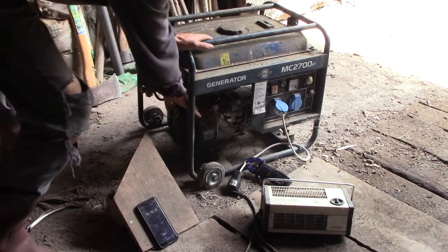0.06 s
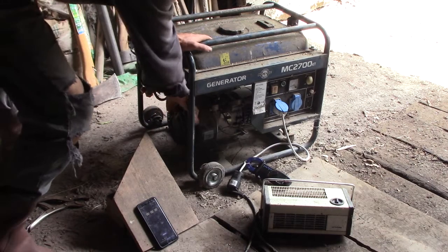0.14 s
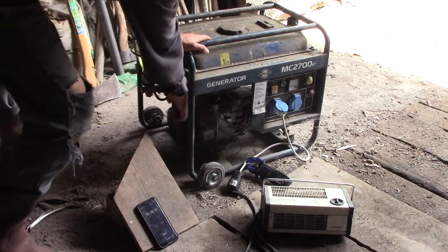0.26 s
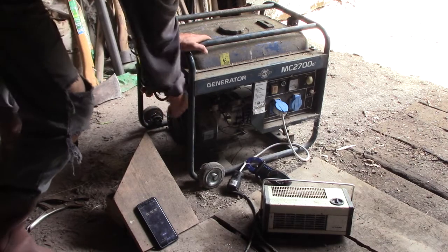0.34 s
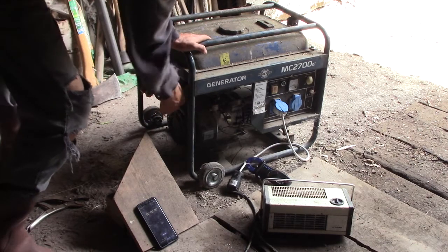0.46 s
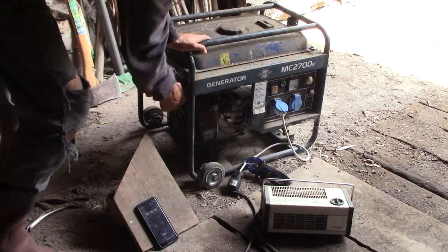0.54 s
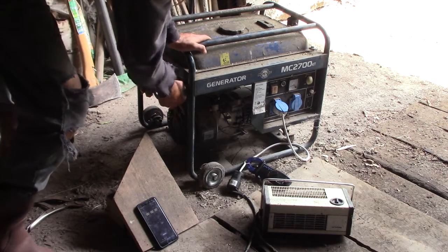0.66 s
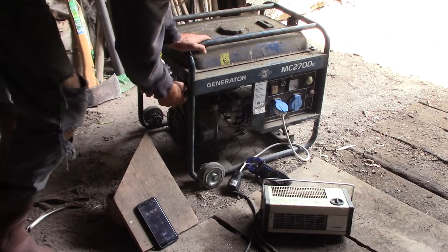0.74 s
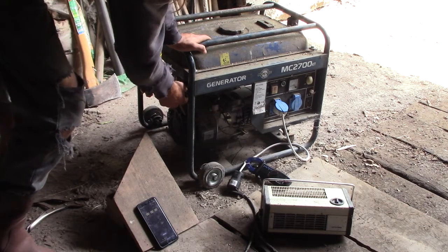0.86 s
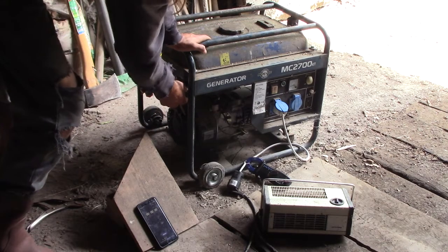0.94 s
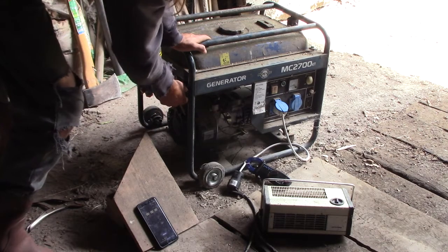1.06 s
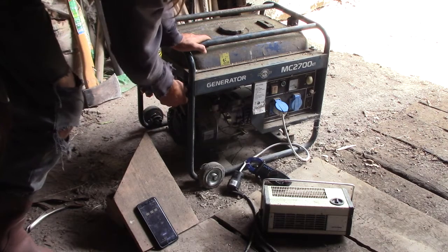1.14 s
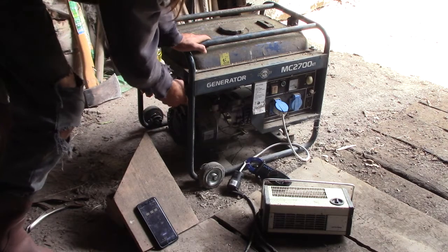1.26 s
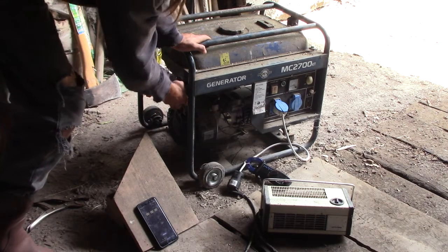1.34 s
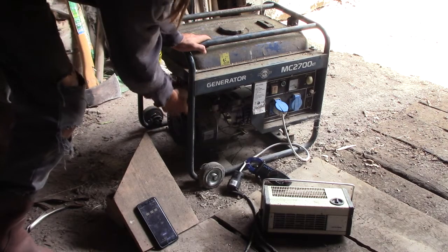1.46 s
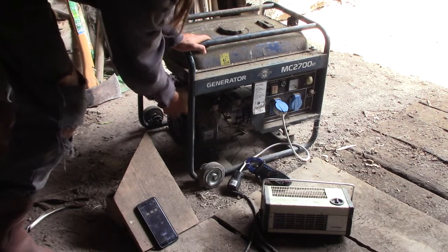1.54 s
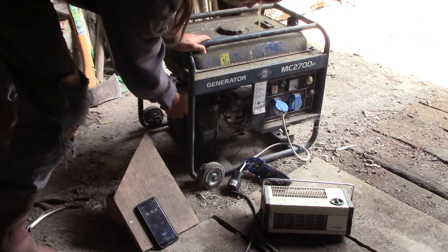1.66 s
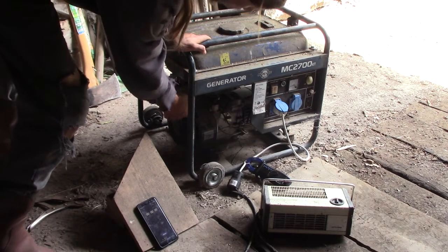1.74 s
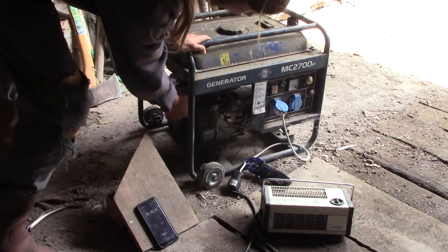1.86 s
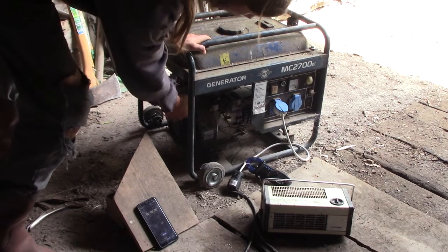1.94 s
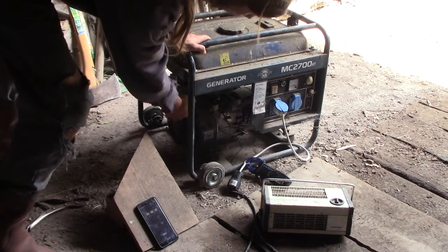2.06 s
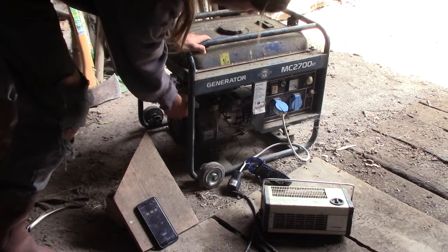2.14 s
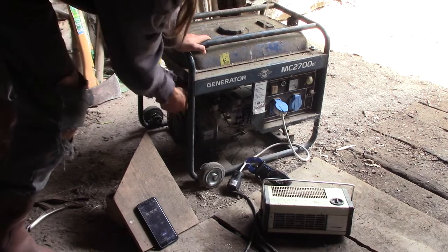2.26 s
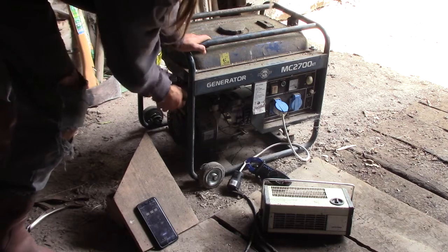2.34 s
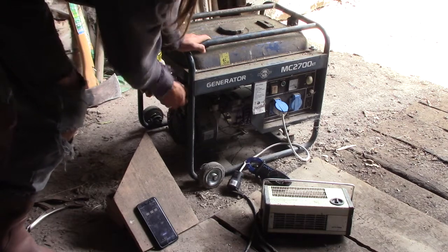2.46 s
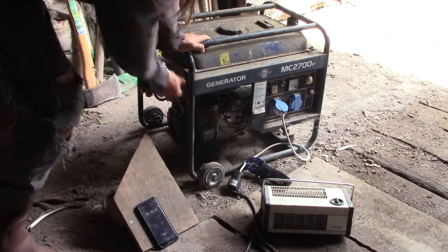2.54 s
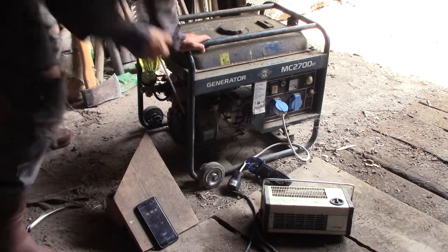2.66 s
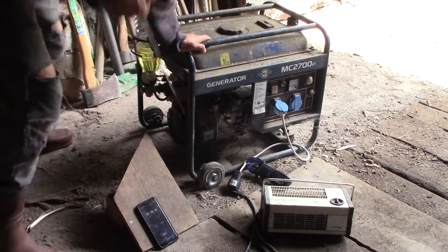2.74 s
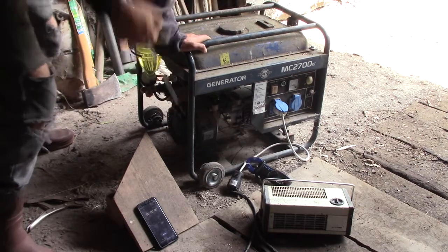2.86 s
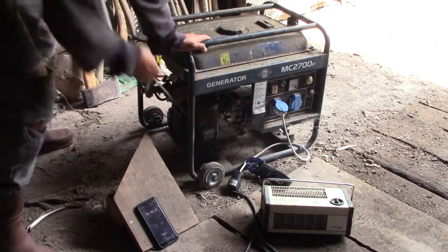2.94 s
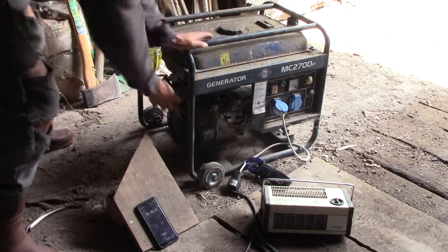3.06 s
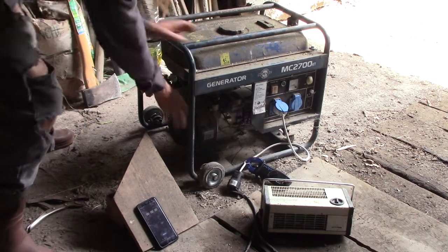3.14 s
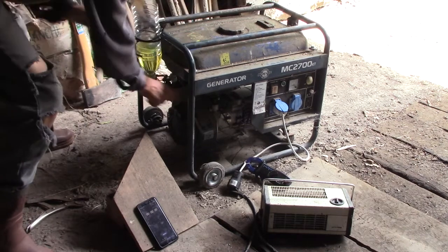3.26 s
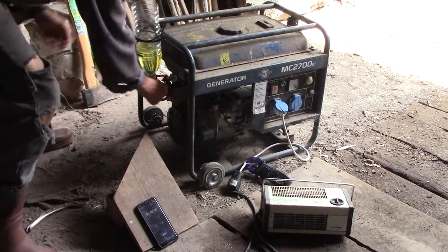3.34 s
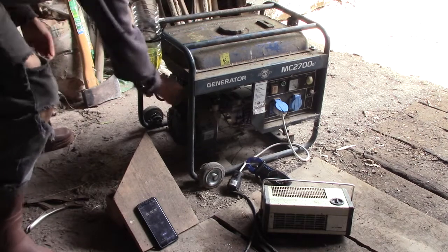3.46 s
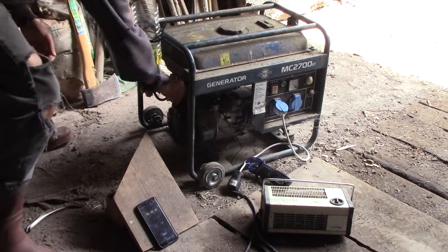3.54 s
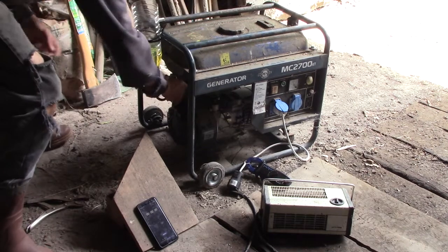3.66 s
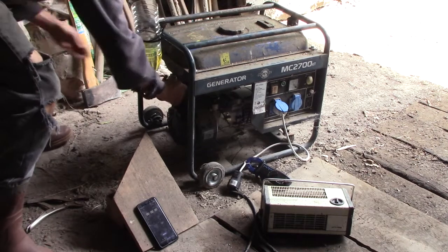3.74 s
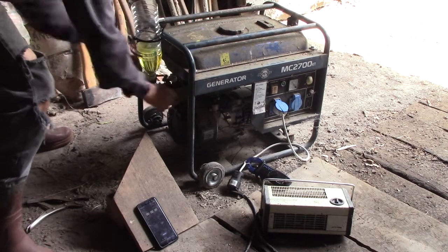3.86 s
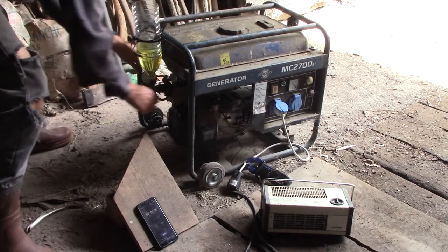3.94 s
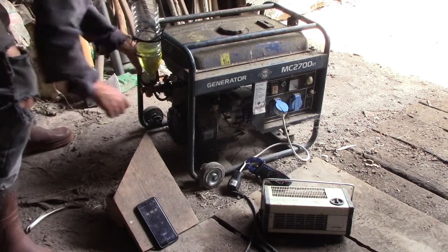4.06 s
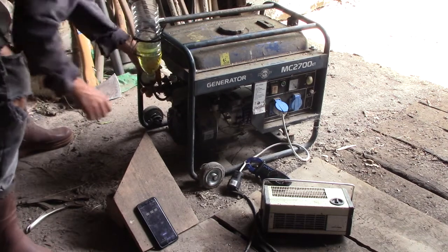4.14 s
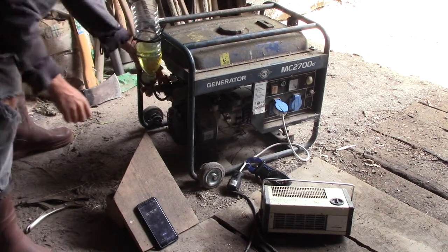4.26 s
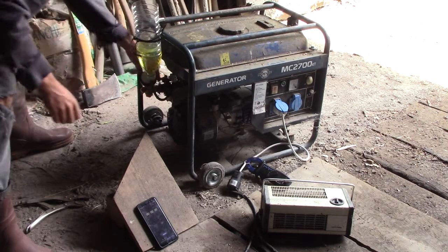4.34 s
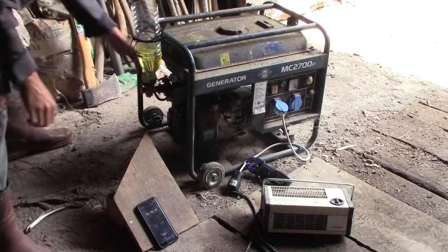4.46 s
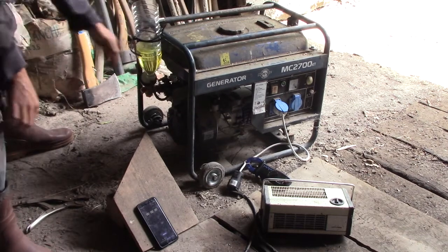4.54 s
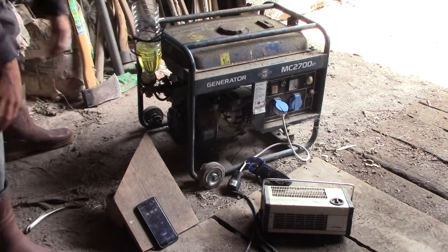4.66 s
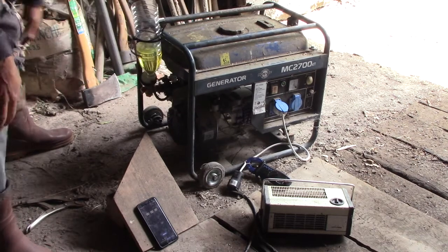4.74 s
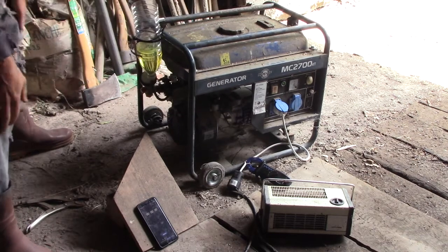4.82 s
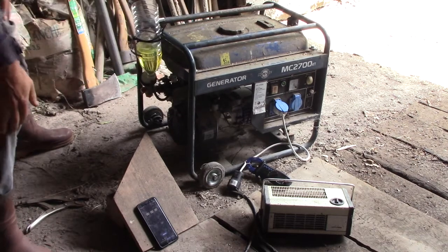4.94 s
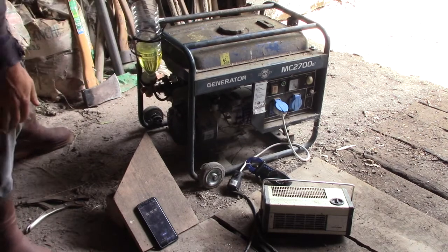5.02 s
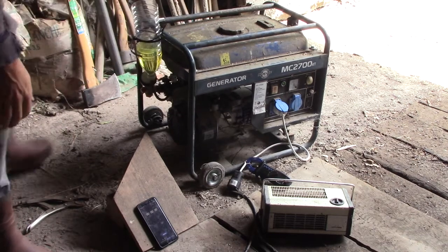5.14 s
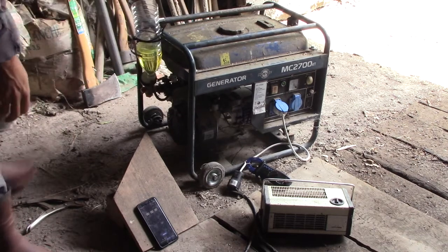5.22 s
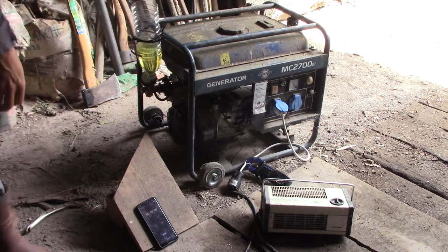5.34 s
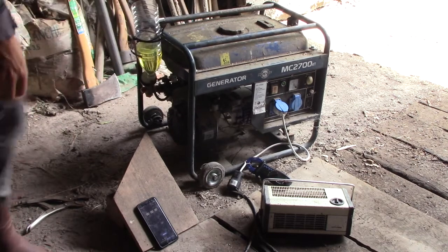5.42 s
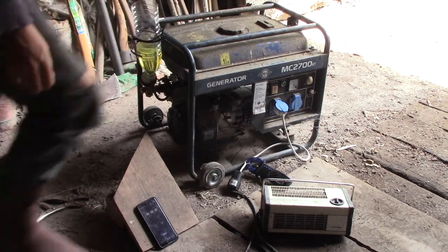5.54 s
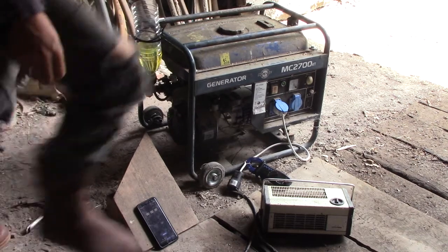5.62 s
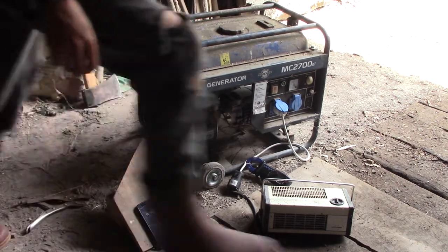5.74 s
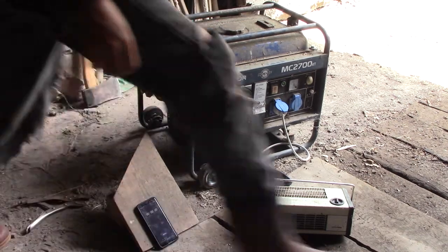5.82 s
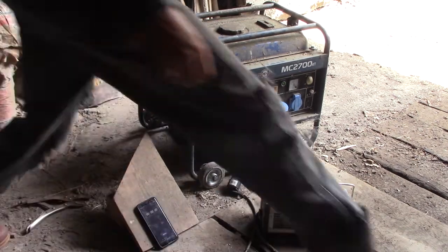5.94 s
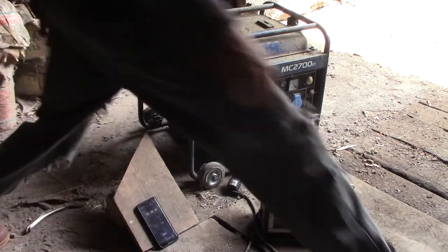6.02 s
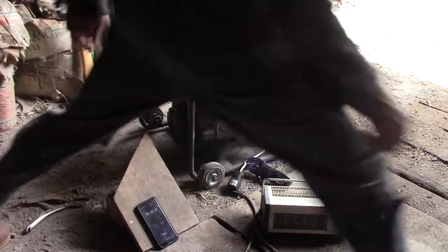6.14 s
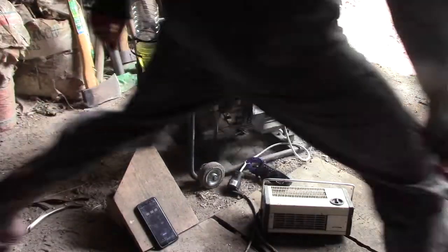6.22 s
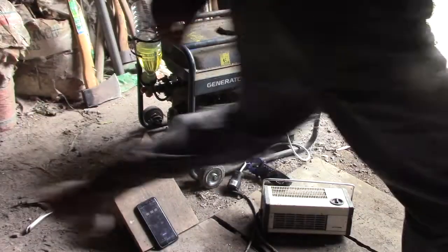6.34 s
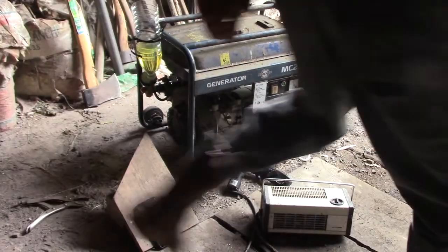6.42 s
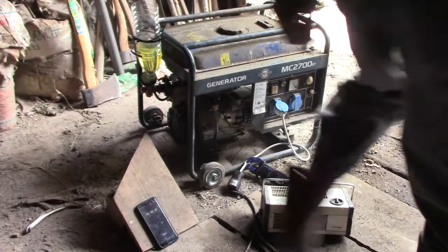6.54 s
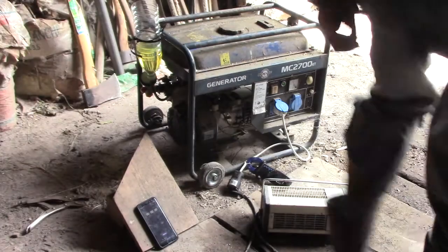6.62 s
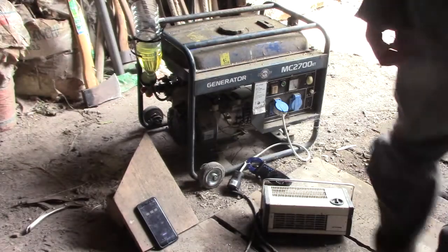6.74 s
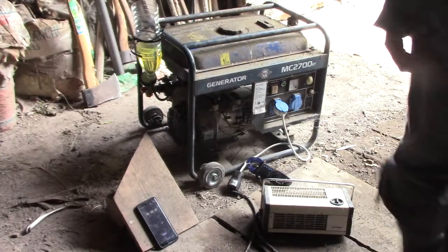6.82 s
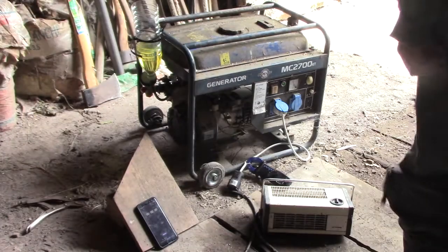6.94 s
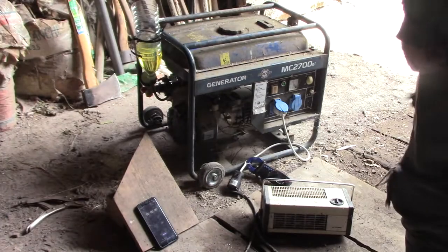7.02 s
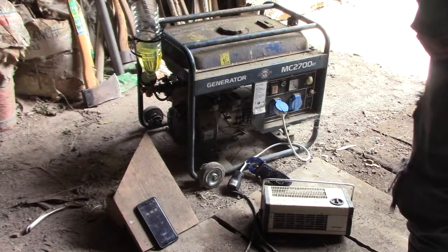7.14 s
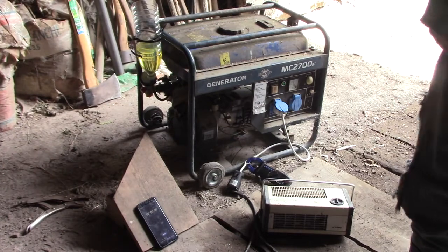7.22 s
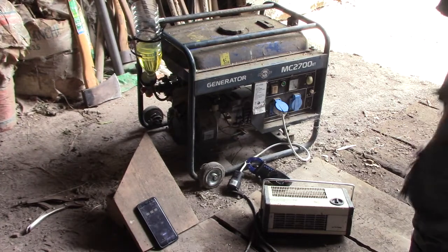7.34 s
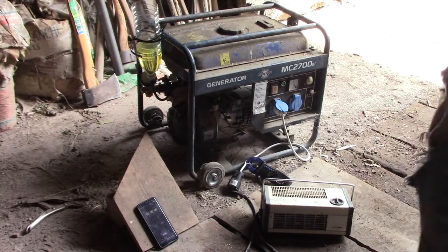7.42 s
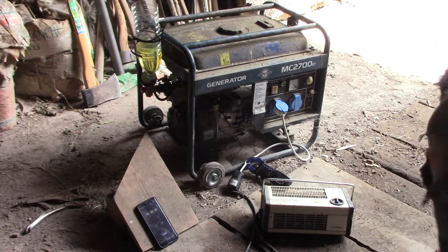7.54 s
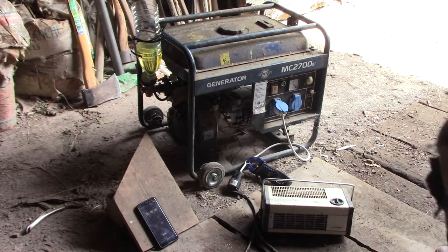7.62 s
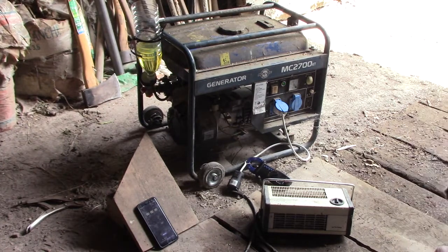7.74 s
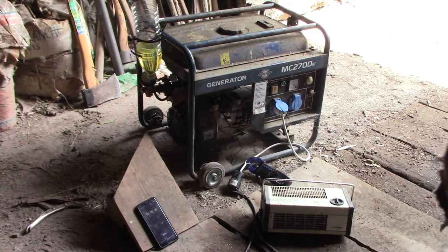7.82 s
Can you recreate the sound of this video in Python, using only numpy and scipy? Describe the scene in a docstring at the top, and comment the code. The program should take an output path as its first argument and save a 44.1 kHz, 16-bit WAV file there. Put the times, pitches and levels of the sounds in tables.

```python
"""A small petrol generator in an open shed

Fingers click its levers, the starter cord is pulled, the single cylinder fires slowly, catches, shakes a
loose panel and runs up to a nearly steady speed; someone then walks past in front. Firings ring a silencer,
valve blows stir noise for the metal parts, knocks ring the frame, and a faint yard murmurs behind.
A close pair of microphones hears it almost in mono, through a peak limiter."""
import sys
import numpy as np
from scipy import signal
from scipy.fft import rfft, irfft, next_fast_len
from scipy.io import wavfile
from scipy.ndimage import uniform_filter1d, minimum_filter1d, map_coordinates

SR = 44100
rng = np.random.default_rng(int(sys.argv[2]) if len(sys.argv) > 2 else 0)


def master(y):
    """Save y as 16-bit WAV."""
    cut = np.clip(np.atleast_2d(y).T, -1, 1)
    pcm = np.round(cut * 32767)  # scale
    wavfile.write(sys.argv[1], SR, pcm.astype(np.int16))


def natural_amplitude(level_db):
    """Convert a level in decibels to a linear amplitude factor, elementwise."""
    exponent = np.asarray(level_db, float) / 20
    return 10 ** exponent


N = 347949  # length in samples

# first, uneven firings: start_s, puff_peak_db
FIRST_FIRINGS = [(2.912, -20.5), (3.07, -17), (3.212, -21.5), (3.339, -16), (3.463, -16.5), (3.59, -16.5),
                 (3.72, -20), (3.846, -18), (3.981, -11), (4.049, -19), (4.107, -17.5), (4.162, -19),
                 (4.213, -9), (4.26, -11), (4.317, -23), (4.374, -47), (4.43, -17), (4.484, -12.5),
                 (4.539, -14.5), (4.588, -21), (4.64, -20), (4.686, -19.5), (4.736, -19.5), (4.789, -22)]
# running up, then holding a speed that drifts a little: time_s, firings_per_s
RUNNING_SPEED = [(4.55, 19.2), (4.72, 20.9), (4.84, 22.1), (5.07, 25.5), (5.2, 27.4), (5.27, 28.2),
                 (5.4, 29.3), (5.74, 31.3), (5.89, 32.2), (6.26, 33.3), (6.62, 33.9), (6.78, 33.4),
                 (7.14, 33.9), (7.36, 33.7), (7.41, 33.9), (7.81, 34.1), (7.89, 33.9)]
EVEN_FROM_S = 4.83  # from here firings follow the running speed
# level of each part by engine speed, before its own swells and boosts:
# firings_per_s, exhaust_db, casing_db, clatter_db, shudder_db, spikiness_0_to_1 (how far blows shape the noise)
LEVELS_BY_SPEED = [(6.85, -38, -40, -48.5, -37, 0.76), (19.3, -47, -36, -49, -32, 0.48),
                   (23.4, -32, -38, -47.5, -34.5, 0.37), (30.3, -29.5, -29, -39, -37.5, 0.1),
                   (32.9, -29.5, -31.5, -40.5, -48.5, 0.14)]

# response of the hot silencer, peaks and valleys: pitch_hz, level_db
HOT_SILENCER = [(35, -63), (65, -34), (100, -26), (120, -13), (137, -16), (170, -22), (203, -17),
                (236, -22), (270, -16), (296, -14), (316, -7), (338, -5), (372, -7), (396, -3), (410, 1),
                (440, -15), (503, -11), (560, -19), (700, -19), (748, -5), (790, -20), (940, -25),
                (985, -12), (1020, -25), (1195, -16), (1300, -23), (1355, -13), (1400, -22), (1560, -28),
                (1626, -19), (1700, -30), (4000, -90)]
# resonances of the cold silencer, before gas flow damps them: pitch_hz, width_hz, level_db
COLD_SILENCER = [(138, 48, -16), (205, 51, -13), (260, 12, -5), (316, 9, 5), (408, 20, -6), (690, 60, -18)]
DAMPING_RATE = 27  # firings per s at which the gas flow doubles the damping of the cold silencer
SWEEP_S_PER_HZ = .00005  # how much later each higher note leaves the main chamber
# the main chamber leads while the engine catches, sags late in the run-up, returns strong and settles
BOOM_EARLY_DB, BOOM_DIP_DB, BOOM_BACK_DB = 4.5, -3, 8.5
BOOM_DIP_S, BOOM_EDGE_S, BOOM_SETTLE_S = (5.27, 5.86), 0.072, 0.44

# clean tones under full throttle, the last a whine: multiple_of_firing_rate, level_db
THROTTLE_TONES = [(6, -55), (7, -39), (8, -58), (9, -39.5), (76, -45)]
# thin tones at steady speed: multiple_of_firing_rate, level_db
THIN_TONES = [(60, -50), (96, -55)]
THROTTLE_S, THROTTLE_EDGE_S, THROTTLED_DB = (4.65, 6.35), 0.22, -8  # opens and closes, edge, tones once closed

# the cord pull heard in the casing: time_s, level_db
CORD_PULL = [(2.47, -79), (2.53, -61), (2.59, -40.5), (2.7, -43), (2.76, -30), (2.795, -38), (2.902, -36.5)]
# the starter's rattle peaks as the cord runs out
PAWL_PEAK_S, PAWL_PEAK_DB, PAWL_RISE_DB_PER_S, PAWL_FALL_DB_PER_S = 2.772, -38, 116, 113
# colour of the casing roar: pitch_hz, relative_db_per_hz
CASING_COLOUR = [(25, -62), (120, -44), (250, -30), (450, -24), (620, -13), (1000, -17), (1500, -18),
                 (3000, -22), (4400, -28), (5500, -45), (9000, -90)]
# notes that stand out of the casing roar: pitch_hz, width_hz, boost_db
CASING_NOTES = [(680, 40, 3), (750, 25, 3), (1420, 40, 3)]
# colour of the metallic clatter: pitch_hz, relative_db_per_hz
CLATTER_COLOUR = [(2500, -0.5), (4000, 1), (5700, 3), (6300, 0), (8400, 2.5), (9100, 3.5), (10500, -5),
                  (12500, -12), (15000, -18), (16000, -34)]
# resonances of the tappets: pitch_hz, width_hz, level_db
TAPPET_NOTES = [(1270, 110, 7), (695, 29, 4.5), (4150, 89, -1), (8080, 220, -1), (10600, 730, -3)]
# colour of the low shudder of the frame: pitch_hz, relative_db_per_hz
SHUDDER_COLOUR = [(25, -57), (70, -17.5), (130, -8), (250, -0.5), (420, -1), (600, -10.5), (900, -42)]
SHUDDER_START_S, SHUDDER_BUILD_S = 2.457, 0.39
PASSING_S, PASSING_HALF_S = 5.88, 0.28  # a body walks past
PASSING_CASING_DB, PASSING_CLATTER_DB = -1.5, -3.5  # and shades these two

# resonances of the loose panel: pitch_hz, width_hz, level_db
PANEL_NOTES = [(1800, 330, 1), (3130, 430, 4), (3730, 750, -1), (8900, 4000, -20)]
# it slaps after each firing while the engine shakes, hardest midway
SLAPPING_S, SLAP_LAG_S, SLAP_PEAK_S = (4.03, 4.66), 0.01, 4.4
SLAP_DB, SLAP_FADE_DB_PER_S = -17.5, 7  # before the burst shape
# bouts of a loose cover's rattle: time_s, peak_db
RATTLE_BOUTS = [(5.25, -30), (5.55, -28), (5.87, -31), (6.32, -29), (6.44, -27), (6.53, -27), (6.75, -26),
                (6.91, -25), (7.36, -30), (7.74, -28), (7.86, -28)]
RATTLE_HZ, RATTLE_LAG_S, RATTLE_BOUT_S, RATTLE_IDLE_DB = 1335, .017, .05, -33
# parts that ring at one point of the slow cycle: share_of_cycle, pitch_hz, level_db (before the soft attack), t60_s
SLOW_PINGS = [(0.38, 1410, -25, 0.058), (0.9, 1300, -23, 0.049), (0.22, 4220, -28, 0.03),
              (0.64, 3900, -30, 0.036)]

# finger and starter knocks on the steel frame: start_s, peak_db (between 1 and 5 kHz), thud_db, brightness_db
FRAME_KNOCKS = [(0.098, -58, 16.5, -30), (0.26, -41.5, -15, -30), (0.3032, -50, 1, -22),
                (0.3675, -40.5, -5, -26), (0.386, -35, -1, -1.5), (0.403, -57, 8, -30),
                (0.687, -53, 3.5, -15), (1.0111, -60.5, 10.5, -7), (1.554, -47, 6.5, -25),
                (2.1155, -49.5, -11, -11), (2.167, -44, -2, -27), (2.1908, -42, -6, -37),
                (2.2526, -34.5, 2.5, -6.5), (2.4302, -55.5, -11, -12), (2.5243, -51, 13.5, 4),
                (2.5821, -40, 7.5, -10), (2.6292, -37, 12.5, -10), (2.7032, -25.5, -6, 6.5),
                (2.7298, -14, -20, 0), (2.7548, -29, 7, -17), (2.7895, -26, -2, -5), (2.806, -27, 3, -15),
                (3.0864, -9.5, -0.5, -17), (3.105, -24, 5, -23)]
# resonances of the steel frame: pitch_hz, width_hz, level_db
FRAME_NOTES = [(300, 100, -10), (465, 30, -3), (600, 50, 1), (740, 60, 4), (1210, 90, -5), (1400, 90, 1),
               (1720, 35, -4), (2500, 40, -3), (2960, 200, -5), (3300, 160, -8), (4130, 35, -3),
               (6000, 3000, -15), (6250, 60, -10), (8350, 140, 0), (9150, 120, -4), (10300, 60, -5),
               (12100, 40, -4), (12750, 40, -5), (13250, 50, -5)]
SCUFF_DB, SCUFF_S = -23, 0.07  # a hand scuffs off after each lever knock: level against its peak, dying time

# colour of the yard murmur, also used for scuffs: pitch_hz, relative_db_per_hz
YARD_COLOUR = [(25, -30), (130, -9.5), (230, -4.5), (500, -0.5), (800, -7), (1100, -8), (2000, -15.5),
               (4000, -22), (8300, -28.5), (15900, -44)]
YARD_DB = -67
# how long the shed rings: pitch_hz, t60_s
SHED_DECAY = [(200, 0.92), (1500, 0.096), (6000, 0.023), (14000, 0.0078)]
# weight of the stereo difference, before a 3 dB lift: pitch_hz, level_db
STEREO_SPREAD = [(30, -31), (125, -62), (250, -56.5), (550, -45.5), (1650, -33.5), (4970, -24),
                 (9000, -22.5), (15000, -20)]


def unit(x):
    """Scales a sound to rms 1."""
    return x / np.sqrt(np.mean(x ** 2) + 1e-20)


def along(points, hz):
    """Reads (Hz, value) points on a log pitch axis."""
    f, v = np.transpose(points)
    return np.interp(np.log(hz + 1), np.log(f + 1), v)


def curves(rows):
    """Gives one value per sample for each column after the time."""
    s, *cols = np.transpose(rows)
    return [np.interp(np.arange(N) / SR, s, c) for c in cols]


def wobble(rate):
    """Draws a smooth random curve with this many knots a second."""
    knots = rng.standard_normal(int(N * rate / SR) + 4)
    return map_coordinates(knots, [np.arange(N) * rate / SR])


def filtered(x, response):
    """Filters x by a complex response of frequency."""
    m = 2 * next_fast_len(N // 2 + SR // 4)
    return irfft(rfft(x, m) * response(np.fft.rfftfreq(m, 1 / SR)), m)[..., :N]


def modes(table):
    """Builds the response of a set of resonances, with alternating signs."""
    def response(f):
        return sum((-1) ** k * natural_amplitude(db) * 1j * f * w / (c * c - f * f + 1j * f * w)
                   for k, (c, w, db) in enumerate(table))
    return response


def causal(points):
    """Builds a response through (Hz, dB) points that acts as early as it can (minimum phase)."""
    def response(hz):
        cepstrum = irfft(np.log(natural_amplitude(along(points, hz))))
        half = len(cepstrum) // 2
        folded = np.r_[cepstrum[0], 2 * cepstrum[1:half], cepstrum[half], np.zeros(half - 1)]
        return np.exp(rfft(folded))
    return response


def noise(spectrum):
    """Makes coloured noise of rms 1."""
    return unit(filtered(rng.standard_normal(N), lambda hz: natural_amplitude(along(spectrum, hz))))


def impulses(times, sizes):
    """Places one spike per event."""
    return np.bincount(np.clip(np.round(times * SR).astype(int), 0, N - 1), sizes, N)


def burst(x, rise, fall):
    """Turns every spike into an envelope that rises and falls with these time constants (s)."""
    t = np.arange(SR // 4) / SR
    return signal.fftconvolve(x, (1 - np.exp(-t / rise)) * np.exp(-t / fall))[:N]


def step_at(s, edge):
    """Makes a smooth change from 0 to 1 around a moment."""
    return (1 + np.tanh((np.arange(N) / SR - s) / edge)) / 2


def firing_times():
    """The uneven start, then a firing each time the running rate completes a cycle."""
    running = curves(RUNNING_SPEED)[0] * (np.arange(N) >= EVEN_FROM_S * SR)
    cycles = np.cumsum(running) / SR
    even = np.flatnonzero(np.diff(np.ceil(cycles))) / SR
    return np.transpose(FIRST_FIRINGS)[0], even


def engine_map():
    """Reads each part's level per sample from the speed that the firings show."""
    times = np.concatenate(firing_times())
    gaps = np.diff(times)
    speed = np.interp(np.arange(N) / SR, times[:-1] + gaps / 2, 1 / gaps)
    smooth_speed = uniform_filter1d(speed, size=4410)
    rate, *parts = np.transpose(LEVELS_BY_SPEED)
    return [np.interp(smooth_speed, rate, p) for p in parts]


def exhaust():
    """Even firings blow the hot silencer, whose resonances lie higher than the cold one's."""
    even, t = firing_times()[1], np.arange(N) / SR
    chance = rng.standard_normal((len(even), 2))
    pulses = impulses(even + .00008 * chance[:, 0], natural_amplitude(.7 * chance[:, 1]))
    turns = rng.uniform(-np.pi, np.pi, 700)

    def silencer(hz):
        # the baffles smear the pulse: outside the main chamber every note leaves at its own moment
        outside = (hz > 450) | (hz < 255)
        smear = np.exp(1j * np.interp(hz / 34, np.arange(700), turns) * outside)
        # inside it the higher notes leave later, so each pulse sweeps upward
        sweep = np.exp(-1j * np.pi * SWEEP_S_PER_HZ * (np.clip(hz, 255, 450) - 300) ** 2)
        return causal(HOT_SILENCER)(hz) * smear * sweep

    note = unit(filtered(pulses, silencer))
    boom = filtered(note, lambda hz: np.exp(-((hz - 375) / 60) ** 4))
    gone, back = (step_at(s, BOOM_EDGE_S) for s in BOOM_DIP_S)
    settling = back * np.exp(-((t - BOOM_DIP_S[1]) / BOOM_SETTLE_S) ** 2)
    boom_db = BOOM_EARLY_DB * (1 - gone) + BOOM_DIP_DB * (gone - back) + BOOM_BACK_DB * settling
    return natural_amplitude(engine_map()[0]) * (note + (natural_amplitude(boom_db) - 1) * boom)


def chugs():
    """The first firings thump in the cold silencer; each stirs its resonances differently."""
    out, f = np.zeros(N + SR), np.fft.rfftfreq(SR, 1 / SR)
    gaps = np.diff(np.r_[firing_times()[0], EVEN_FROM_S])
    blunt = 1j * f / (90 + 1j * f) / (1 + 1j * f / 600) ** 2  # a soft-edged push of gas
    stirs = rng.standard_normal((len(FIRST_FIRINGS), len(COLD_SILENCER), 2))
    for (s, db), gap, stir in zip(FIRST_FIRINGS, gaps, stirs):
        damping = 1 + (1 / gap / DAMPING_RATE) ** 2
        stirred = [(c * (1 + .008 * u), w * damping, level + 2.5 * v)
                   for (c, w, level), (u, v) in zip(COLD_SILENCER, stir)]
        puff = irfft(modes(stirred)(f) * blunt)[:SR // 2]
        puff = natural_amplitude(db) * puff / np.max(abs(puff))
        out[round(s * SR):][:len(puff)] += puff
        # the rising piston pushes out a second, weaker puff
        out[round((s + .3 * gap) * SR):][:len(puff)] += natural_amplitude(-11.0) * puff
    return out[:N]


def engine_tones():
    """Open throttle: multiples of the firing rate glide as clear tones; once closed, thin high ones hold."""
    turn = 2 * np.pi * np.cumsum(curves(RUNNING_SPEED)[0]) / SR
    opened, closed = (step_at(s, THROTTLE_EDGE_S) for s in THROTTLE_S)
    clear = sum(natural_amplitude(db + 2.1 * wobble(3.8)) * np.sin(k * turn + rng.uniform(0, 2 * np.pi))
                for k, db in THROTTLE_TONES)
    thin = sum(natural_amplitude(db + 5.7 * wobble(9.9)) * np.sin(k * turn) for k, db in THIN_TONES)
    return np.sqrt(2) * (opened * natural_amplitude(THROTTLED_DB * closed) * clear + closed * thin)


def mechanical_blows(times):
    """The starter's pawls tick during the pull, then two valves open and close once a cycle."""
    pawls = np.linspace(CORD_PULL[0][0], CORD_PULL[-2][0], num=14) + rng.uniform(0, 0.016, size=14)
    valves = [times[:-1] + share * np.diff(times) for share in (.02, .25, .65, .88)]
    moments = np.concatenate([pawls, *valves])
    return impulses(moments, natural_amplitude(rng.normal(0, 3, len(moments))))


def casing(level_db, spiky, times, blows):
    """The casing roars in its own notes and swells with each firing and blow."""
    def boost(hz):
        return natural_amplitude(sum(db / (1 + (2 * (hz - c) / w) ** 2) for c, w, db in CASING_NOTES))
    fired = 1.33 * burst(impulses(times, np.ones(len(times))), 0.0044, 0.026)
    struck = 1.38 * burst(blows, 0.0021, 0.0074)
    roar = unit(filtered(noise(CASING_COLOUR), boost))
    return roar * (1 + spiky * (fired + struck)) * natural_amplitude(level_db + 2.2 * spiky * wobble(45))


def clatter(level_db, spiky, blows):
    """Pawls and valves put sharp ticks on bright metallic noise."""
    ticks = 1 + 1.8 * spiky * burst(blows, 0.00034, 0.01)
    return noise(CLATTER_COLOUR) * ticks * natural_amplitude(level_db + 0.87 * wobble(40))


def tappets(casing_db, spiky, blows):
    """Each blow lets out a short burst of noise in the tappets' resonances."""
    ringing = unit(filtered(rng.standard_normal(N), modes(TAPPET_NOTES)))
    return ringing * spiky * burst(blows, 0.00056, 0.0064) * natural_amplitude(casing_db + 3.0)


def shudder(level_db):
    """The frame shudders as low noise that builds up from the cord pull."""
    since = np.clip(np.arange(N) / SR - SHUDDER_START_S, 0, None)
    build = 1 - np.exp(-(since / SHUDDER_BUILD_S) ** 2)
    return noise(SHUDDER_COLOUR) * build * natural_amplitude(level_db + 2.5 * wobble(25))


def machinery():
    """Sets the levels of the moving metal parts, from the cord pull on, and adds them up."""
    times, t = np.concatenate(firing_times()), np.arange(N) / SR
    _, casing_db, clatter_db, shudder_db, spiky = engine_map()
    spiky = np.clip(spiky, 0, 1)
    shade = np.exp(-((t - PASSING_S) / PASSING_HALF_S) ** 2)
    rise, fall = PAWL_RISE_DB_PER_S * (t - PAWL_PEAK_S), PAWL_FALL_DB_PER_S * (PAWL_PEAK_S - t)
    pawl_db = PAWL_PEAK_DB + np.minimum(rise, fall)
    pulling = t < CORD_PULL[-1][0]
    casing_db = np.where(pulling, curves(CORD_PULL)[0], casing_db + PASSING_CASING_DB * shade)
    engine_db = np.maximum(pawl_db, clatter_db + PASSING_CLATTER_DB * shade)
    clatter_db = np.where(t < PAWL_PEAK_S, pawl_db, engine_db)
    blows = mechanical_blows(times)
    parts = casing(casing_db, spiky, times, blows) + clatter(clatter_db, spiky, blows)
    parts += tappets(casing_db, spiky, blows) + shudder(shudder_db)
    return (t > CORD_PULL[0][0]) * parts


def panel():
    """Each slap is a short burst of noise in the panel's resonances."""
    s = firing_times()[0]
    s = s[(s > SLAPPING_S[0]) & (s < SLAPPING_S[1])] + SLAP_LAG_S
    sheet = unit(filtered(rng.standard_normal(N), modes(PANEL_NOTES)))
    size = natural_amplitude(SLAP_DB - SLAP_FADE_DB_PER_S * abs(s - SLAP_PEAK_S))
    return sheet * burst(impulses(s, size), 0.0029, 0.0068)


def rattle():
    """A loose cover rings briefly after every even firing, loudest in short bouts."""
    s, t = firing_times()[1] + RATTLE_LAG_S, np.arange(SR // 20) / SR
    bouts = sum(natural_amplitude(db) * np.exp(-((s - at) / RATTLE_BOUT_S) ** 2) for at, db in RATTLE_BOUTS)
    size = natural_amplitude(RATTLE_IDLE_DB) + bouts
    chance = rng.standard_normal((len(s), 2))
    ring = np.sin(2 * np.pi * RATTLE_HZ * t) * t / .003 * np.exp(1 - t / .003)
    hits = impulses(s + .0003 * chance[:, 0], size * natural_amplitude(1.5 * chance[:, 1]))
    return signal.fftconvolve(hits, ring)[:N]


def pings():
    """At low speed the slack in the crank and valve gear rings out as short metallic notes."""
    times, t, out = firing_times()[0], np.arange(SR // 10) / SR, np.zeros(N + SR)
    times = times[times < SLAPPING_S[0]]
    for share, hz, db, t60 in SLOW_PINGS:
        chance = rng.standard_normal((len(times) - 1, 3))
        for s, (late, size, tune) in zip(times[:-1] + share * np.diff(times), chance):
            ring = np.sin(2 * np.pi * hz * (1 + 0.02 * tune) * t) * (1 - np.exp(-t / 0.0061))
            fading = natural_amplitude(db + 3 * size - 60 * t / t60)
            out[round((s + .003 * late) * SR):][:len(t)] += fading * ring
    return out[:N]


def knocks():
    """Every knock is a burst of noise in the frame's resonances; hard, thin blows crack."""
    out, t = np.zeros(N + SR), np.arange(SR // 4) / SR
    f = np.fft.rfftfreq(SR // 2, 1 / SR)
    hz, width, level = np.transpose(FRAME_NOTES)[:, :, None]
    for s, db, thud_db, bright_db in FRAME_KNOCKS:
        strength = natural_amplitude(level + rng.normal(0, 2, level.shape))
        ring = np.sum(strength * 1j * f * width / (hz ** 2 - f ** 2 + 1j * f * width), axis=0)
        crack = natural_amplitude(.4 * (db - thud_db + 27) - 60 * t / .018)
        body, tail = natural_amplitude(-60 * t / .045), natural_amplitude(-16 - 60 * t / .3)
        blow = rng.standard_normal(len(t)) * (crack + body + tail) * (1 - np.exp(-t / 0.0006))
        sound = rfft(blow, SR // 2) * ring
        # thud tilts the low end, brightness the high end
        tilt = along([(900, thud_db), (1100, 0), (1900, 0), (4200, .3 * bright_db), (5500, bright_db),
                      (11000, bright_db), (16000, bright_db - 12)], f)
        peak = np.max(abs(irfft(sound * (f > 1000) * (f < 5000))))
        out[round(s * SR):][:len(t)] += natural_amplitude(db) * irfft(sound * natural_amplitude(tilt))[:len(t)] / peak
    return out[:N]


def scuffs():
    """Hands rub off the frame after each knock before the pull, as soft fading noise."""
    t = np.arange(N) / SR
    rub = sum(natural_amplitude(db + SCUFF_DB) * np.clip((t - s) / 0.0082, 0, 1) * np.exp(-abs(t - s) / SCUFF_S)
              for s, db, _, _ in FRAME_KNOCKS if s < CORD_PULL[0][0])
    return noise(YARD_COLOUR) * rub * natural_amplitude(2.5 * wobble(30))


def yard():
    """Distant outdoor murmur of wind and leaves: coloured noise that wavers in level."""
    return noise(YARD_COLOUR) * natural_amplitude(YARD_DB + wobble(7.62))


def shed(x):
    """Two unrelated answers of the walls; each frequency dies at its own speed."""
    hz, t, z = signal.stft(rng.standard_normal((2, SR // 2)), SR, nperseg=256)
    fading = natural_amplitude(-60 * t / along(SHED_DECAY, hz)[:, None])
    tail = signal.istft(z * fading, SR, nperseg=256)[1]
    late = np.pad(x, (300, 0))[None]  # the walls answer 300 samples later
    return signal.fftconvolve(late, tail / np.linalg.norm(tail[0]), axes=1)[:, :N]


def scene():
    """The machine, the walls and the yard; only scattered sound differs between the microphones."""
    struck, thumps = knocks() + panel() + pings() + rattle(), chugs()
    dry = struck + thumps + exhaust() + engine_tones() + machinery() + scuffs() + yard()
    side = filtered(shed(dry)[1], lambda hz: natural_amplitude(along(STEREO_SPREAD, hz) + 3.0))
    # the running exhaust stays dry in the middle; struck parts and first thumps ring in the shed
    mid = dry + natural_amplitude(-12.0) * shed(struck)[0] + natural_amplitude(-17) * shed(thumps)[0]
    return np.array([mid + side, mid - side])


def low_pass(x):
    """Removes everything above the highest recorded frequency."""
    return signal.sosfilt(signal.butter(12, 16010, fs=SR, output="sos"), x)


def record(dry):
    """The deep bass is rolled off, everything above 15.9 kHz is cut, and a limiter holds the peaks down."""
    heard = filtered(dry, lambda hz: (1j * hz / (45 + 1j * hz)) ** 2 * (hz < 15900))
    need = np.minimum(1, .195 / (np.max(abs(heard), axis=0) + 1e-9))
    gain = uniform_filter1d(minimum_filter1d(need, size=161), size=81)
    return low_pass(heard * gain)


dry = scene()
out = record(dry)
master(out)
```